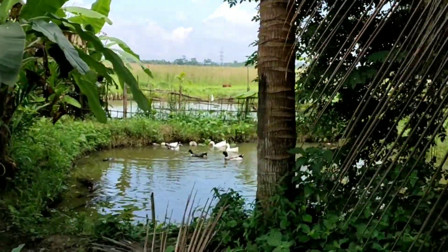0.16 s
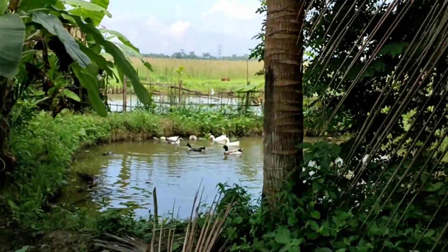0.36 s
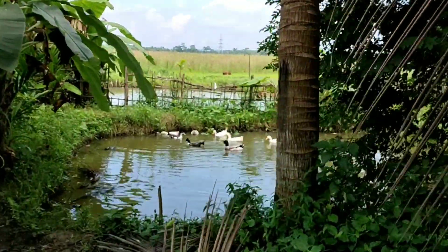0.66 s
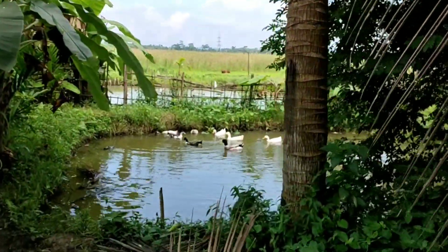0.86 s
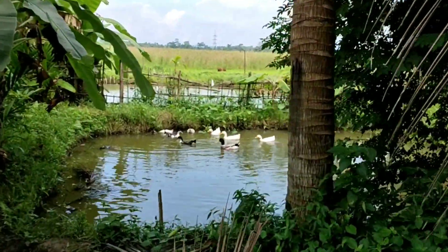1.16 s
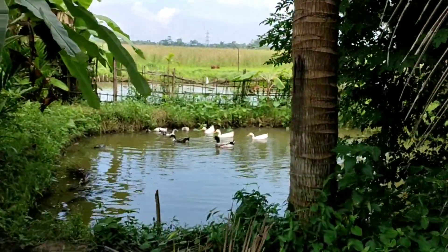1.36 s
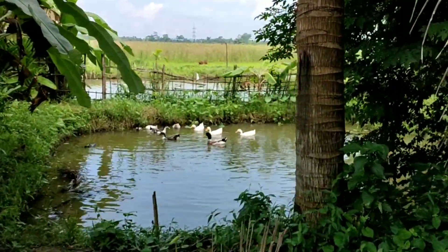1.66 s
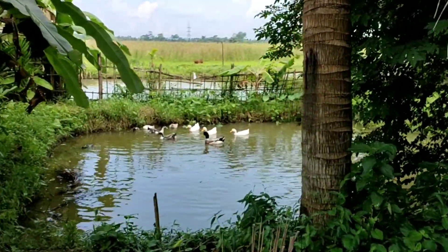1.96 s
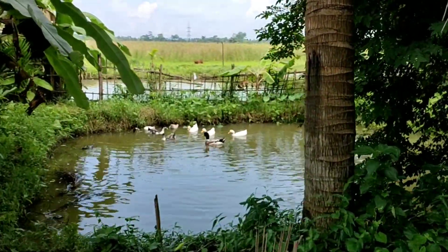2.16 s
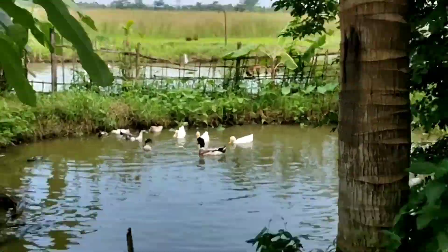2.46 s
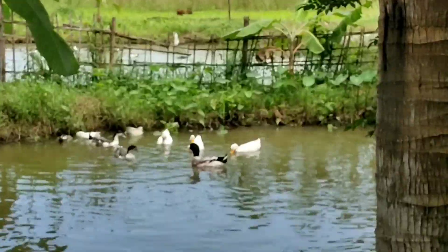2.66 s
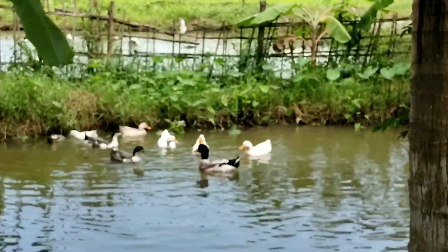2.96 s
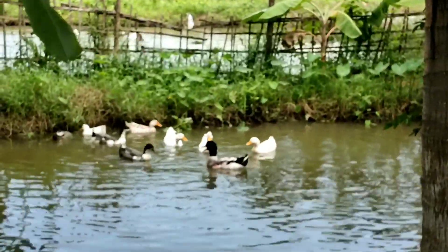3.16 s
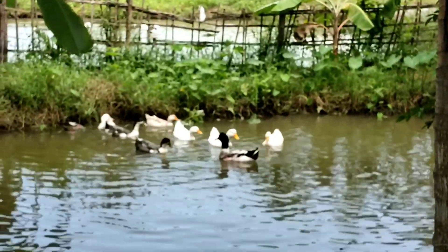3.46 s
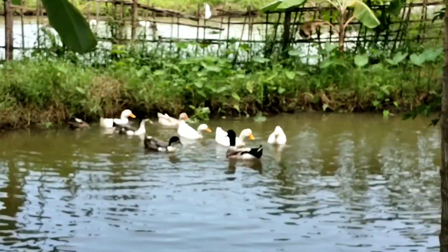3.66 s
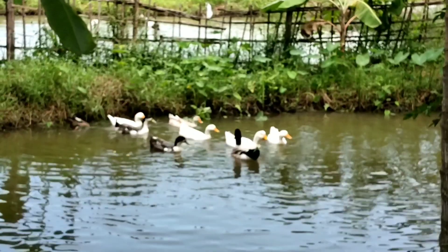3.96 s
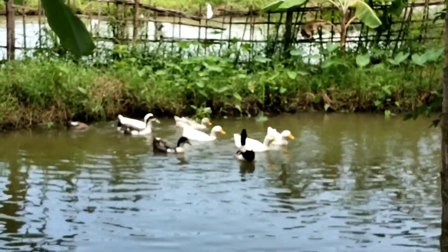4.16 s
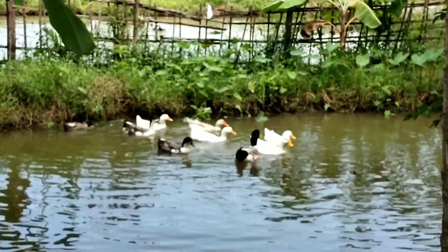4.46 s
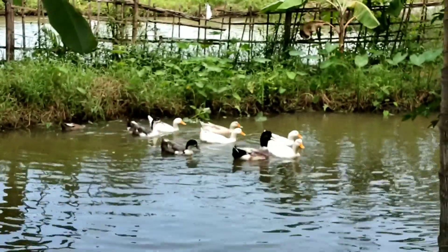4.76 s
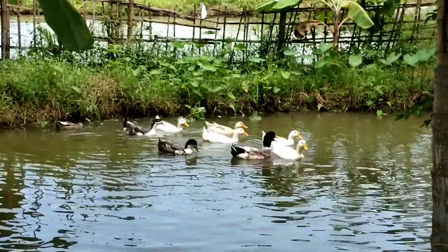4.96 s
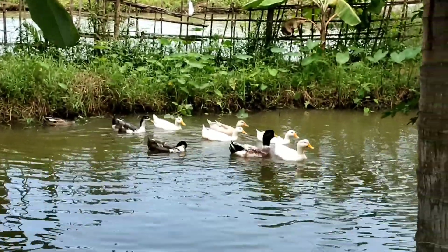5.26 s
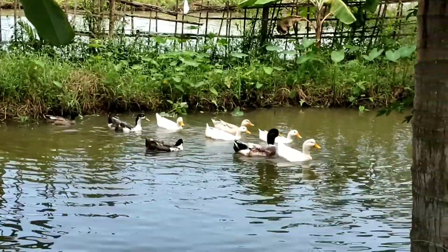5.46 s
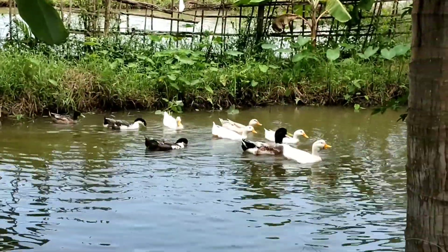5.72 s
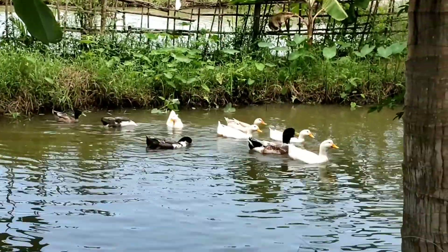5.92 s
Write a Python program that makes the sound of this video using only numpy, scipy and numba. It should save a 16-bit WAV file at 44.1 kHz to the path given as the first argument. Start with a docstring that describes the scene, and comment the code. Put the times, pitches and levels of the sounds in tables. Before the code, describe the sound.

Beside a village pond, a domestic duck gives eight strong, buzzy, nasal quacks in steady rhythm, the first already under way at the start. Short airy echoes follow each one. Quiet insects, leaf rustle, water plops, dull thumps and hollow low notes with little scrapes fill the gaps, along with an early bird trill, faint motor buzzes and a distant engine whine late on. Wind lightly brushes the microphone.

```python
"""A duck quacks eight times at an even pace beside a pond: clicks and puffs of its syrinx ring through
beak and throat, and dying bands of noise give the short tail from banks and trees.
Around it, shaped noise makes the far country hum, insects, wind on the microphone, water plops, thumps
and low hollow notes near 330 Hz, some of them the duck's low second harmonic, with short scrapes; falling
sine whistles make a small bird, and sines a small camera motor buzzing now and then and a far engine revving."""
import sys
import numpy as np
from scipy import signal
from scipy.io import wavfile
from scipy.ndimage import uniform_filter1d, minimum_filter1d
from numba import njit

SR = 44100
rng = np.random.default_rng(int(sys.argv[2]) if len(sys.argv) > 2 else 0)


def file_out(sig):
    """Save sig as 16-bit WAV at sys.argv[1]."""
    # one column per channel
    cols = np.atleast_2d(sig).T
    # limit, then scale
    lim = np.clip(cols, -1, 1)
    pcm = np.round(lim * 32767).astype(np.int16)
    wavfile.write(sys.argv[1], SR, pcm)


def field_ratio(decibels):
    """Amplitude ratio for a level in dB (20 dB per decade); scalars and array-likes work."""
    return 10 ** (np.asarray(decibels, dtype=float) / 20)


N = 268569


def rms_one(x):
    """Scale to unit rms."""
    return x / np.sqrt(np.mean(x ** 2) + 1e-20)


def in_time(rows):
    """Columns of a table joined by straight lines in time."""
    s, *columns = np.transpose(rows)
    return [np.interp(np.arange(N) / SR, s, c) for c in columns]


def gate(rows, fade_s):
    """One while the table lasts, with short ramps outside it."""
    start, end = rows[0][0], rows[-1][0]
    return np.interp(np.arange(N) / SR, [start - fade_s, start, end, end + fade_s], [0, 1, 1, 0])


def drift(rate_hz):
    """Slow random wander of unit spread, drawn at every 40th sample."""
    r = np.exp(-80 * np.pi * rate_hz / SR)
    slow = signal.lfilter([1], [1, -2 * r, r * r], rng.standard_normal(N // 40 + 2002))[2000:]
    return np.interp(np.arange(N) / 40, np.arange(len(slow)), rms_one(slow))


def filtered(x, order, hz, kind):
    """Butterworth filter."""
    return signal.sosfilt(signal.butter(order, hz, kind, fs=SR, output="sos"), x)


@njit
def sweep(x, hz, r, sr):
    """Two-pole resonance with a moving centre, gain 1 on top."""
    y = np.zeros(len(x))
    for i in range(2, len(x)):
        drive = (1 - r * r) / 2 * (x[i] - x[i - 2])
        y[i] = drive + 2 * r * np.cos(2 * np.pi * hz[i] / sr) * y[i - 1] - r * r * y[i - 2]
    return y


def resonate(x, hz, width_hz):
    """A resonance at a fixed or moving pitch."""
    return sweep(x + 1e-18, hz * np.ones(len(x)), np.exp(-np.pi * width_hz / SR), SR)


def resonate_twice(x, hz, width_hz):
    """Two equal resonances in a row, for steeper skirts."""
    return resonate(resonate(x, hz, width_hz), hz, width_hz)


def modes(x, table):
    """Steep resonances in parallel, signs alternating."""
    total = 0
    for k, (hz, width_hz, db) in enumerate(table):
        mode = resonate(resonate(x, hz, width_hz * 2), hz, width_hz)
        total = total + (-1) ** k * field_ratio(db) * mode
    return total


def evened(x, span_s=0.015):
    """Unit level over a short running span."""
    return x / np.sqrt(uniform_filter1d(x ** 2, int(span_s * SR)) + 1e-12)


def coloured(spectrum, edges, patchy_db):
    """Bands of noise, each flickering on its own; returned band by band, summing to rms 1."""
    white, (hz, db) = rng.standard_normal((2, N)), np.transpose(spectrum)
    bands = []
    for k, (low, high) in enumerate(zip(edges, edges[1:])):
        band = filtered(white[k % 2], 2, [low, high], "band")
        level_db = np.interp(np.log(low * high) / 2, np.log(hz), db)
        bands.append(band * field_ratio(level_db + patchy_db * drift(24)))
    return np.array(bands) / np.sqrt(np.mean(np.sum(bands, axis=0) ** 2))


def swells(rows, rise_s, fall_db_per_s):
    """Gain of events (full_s, level_db, hold_s) that rise to full level, hold and die away."""
    t = np.arange(N) / SR
    gain = 0
    for s, db, hold_s in rows:
        fall_db = fall_db_per_s * np.clip(t - s - hold_s, 0, 1)
        gain = gain + field_ratio(db - fall_db) * np.clip(1 + (t - s) / rise_s, 0, 1)
    return gain


def bursts(rows, rise_s, width):
    """Short noisy notes: a swelling and dying puff through a resonance, its width a share of its pitch."""
    out, t = np.zeros(N + SR), np.arange(SR // 4) / SR
    noise = rng.standard_normal((len(rows), len(t)))
    for puff, (s, db, hz, length_s) in zip(noise, rows):
        note = resonate_twice(puff, hz, width * hz)
        shape = np.clip(t / rise_s, 0, 1) * np.exp(-t / max(length_s, .004))
        start = round(s * SR)
        out[start:start + len(t)] += field_ratio(db) * rms_one(note) * shape / 2
    return out[:N]


# the quacks: first_snap_s, hold_end_s, level_db, first_rate_hz, last_rate_hz (rates of the snaps)
QUACKS = [(-0.12, 0.113, -12.5, 140.2, 162.7), (0.694, 0.927, -14, 131.3, 168.4),
          (1.543, 1.777, -12.5, 141, 167.4), (2.328, 2.557, -12.5, 138.1, 164.6),
          (3.148, 3.373, -12.5, 131, 170.4), (3.908, 4.143, -12.5, 143.7, 172.2),
          (4.645, 4.886, -13, 142.9, 170.9), (5.442, 5.667, -11.5, 134.3, 163.5)]
# the gesture all quacks share: share_of_call, relative_level_db, share_of_pitch_rise, beak_hz,
# mid_throat_db, upper_throat_db, lower_throat_db
QUACK_GESTURE = [(0, -25, 0.024, 1300, -3, -11.5, -1.5), (.08, -21, 0.065, 1300, -10.5, -13.5, -8.5),
                 (.16, -8, .12, 1506, -5, -7, -3.5), (.25, -3.5, .28, 1670, -1, -16, -0.5),
                 (.36, 1.1, .65, 1650, -2, -6.5, 0.2), (0.609, 1, .9, 1750, -6, -3, -0.7),
                 (1.024, -2, 1, 1838, -3.5, -5, 6.4), (1.088, -42.5, 0.76, 1720, 15.5, -30, -4)]


def calls():
    """Every quack stretches the common gesture over its own length, level and pitch range."""
    share, db, rise, *throat = np.transpose(QUACK_GESTURE)
    rows = []
    for s, end, peak_db, first_hz, last_hz in QUACKS:
        pitch_hz = first_hz + rise * (last_hz - first_hz)
        rows.append(np.transpose([s + share * (end - s), peak_db + db, pitch_hz, *throat, share]))
    return rows


HALF_SNAP_DB, HALF_SNAP_FADES = -6, .25   # second snap in mid cycle; gone by this share of the call
BREATH_GROWS = .3   # share of the call by which turbulence reaches full strength


def syrinx(pitch_hz, share, puff_s=0.00085):
    """The syrinx snaps shut once a cycle; each snap is a click with a short puff of turbulence."""
    phase = np.cumsum(pitch_hz * (1 + .004 * drift(60))) / SR
    for first in [round(q[0] * SR) for q in QUACKS[1:]]:      # these calls open on a snap
        phase[first:] += np.ceil(phase[first]) - phase[first]
    snaps = np.diff(np.floor(phase), prepend=0) * field_ratio(1.3 * rng.standard_normal(N))
    half_snaps = np.diff(np.floor(phase + .5), prepend=0) * field_ratio(HALF_SNAP_DB)
    snaps = snaps + half_snaps * np.clip(1 - share / HALF_SNAP_FADES, 0, 1)
    r = np.exp(-1 / (puff_s * SR))
    puff = signal.lfilter([(1 - r) * np.e], [1, -2 * r, r * r], snaps)      # swells, then dies
    turbulence = (puff + .1) * rng.standard_normal(N) * np.clip(share / BREATH_GROWS, .6, 1)
    bright = filtered(turbulence, 1, 1200, "high")
    clear, raspy = snaps + .075 * bright, snaps + .14 * turbulence
    return clear, raspy


# fixed resonances of windpipe and throat: pitch_hz, width_hz, relative_level_db
LOWER_THROAT = [(330, 110, -26), (1120, 300, -15), (600, 500, -32), (2230, 300, -8), (2950, 450, -5),
                (3680, 380, -4)]
MID_THROAT = [(4662, 435, 0)]
UPPER_THROAT = [(5470, 660, 2.57), (5994, 456, 5.8)]
# faint top resonances of the bill: pitch_hz, width_hz, relative_level_db
BILL = [(7150, 350, -11), (8070, 460, -24.5), (9520, 360, -32), (10400, 460, -36), (11370, 420, -44),
        (12000, 670, -36)]
SIDE_CAVITY_HZ, THROAT_TOP_HZ = 4240, 6410   # a side pocket swallows one band; the throat closes above


def duck(beak_width_hz=480, water_s=0.00078, water_db=-12.0):
    """Snaps ring through a moving beak and fixed throat resonances, whose balance shifts in the call."""
    gesture = calls()
    level_db, pitch_hz, beak_hz, mid_db, upper_db, lower_db, share = in_time(np.vstack(gesture))
    clear, raspy = syrinx(pitch_hz, share)
    beak = resonate_twice(clear, beak_hz, beak_width_hz)
    lower = evened(beak + field_ratio(lower_db) * modes(clear, LOWER_THROAT))
    middle = evened(modes(raspy, MID_THROAT))
    throat_top = filtered(modes(raspy, UPPER_THROAT), 6, THROAT_TOP_HZ, "low")
    upper = evened(throat_top + modes(raspy, BILL))
    mid, high = field_ratio(mid_db), field_ratio(upper_db)       # the upper throat speaks once the neck is stretched
    low = np.sqrt(np.clip(1 - mid ** 2 - high ** 2, .05, 1))   # the lower throat gets the remaining power
    voice = low * lower - mid * middle + high * upper
    voice = voice - 0.9 * resonate(voice, SIDE_CAVITY_HZ, 260)
    voice = voice + field_ratio(water_db) * np.roll(voice, round(water_s * SR))      # mirror image in the water
    return voice * field_ratio(level_db) * sum(gate(q, 0.0019) for q in gesture)


# tail from the banks: band_hz, t60_s, relative_level_db
BANK_TAIL = [(1300, 0.068, -16), (2510, 0.39, -16), (3420, 0.33, -23), (5500, 0.44, -36),
             (7750, 0.33, -27.5)]
# one hollow of the bank rings longer: pitch_hz, width_hz, t60_s, relative_level_db
BANK_HOLLOW = (2200, 258, 0.5, -23)


def banks(x, rise_s=0.0013):
    """Scattered echoes: nearly octave-wide bands of dying noise and one narrow ring."""
    t = np.arange(SR // 2) / SR

    def echo(dying, hz, db):
        """Unit energy, then level and a weight growing with pitch."""
        return field_ratio(db) * dying / np.sqrt(np.sum(dying ** 2)) * np.sqrt(hz / SR * 2)

    reply = 0
    for hz, t60, db in BANK_TAIL:
        band = filtered(rng.standard_normal(len(t)), 2, [hz / 1.85, hz * 1.05], "band")
        dying = band * field_ratio(-60 * t / t60) * np.clip(t / rise_s, 0, 1)
        reply = reply + echo(dying, hz, db)
    hz, width_hz, t60, db = BANK_HOLLOW
    dying = resonate(rng.standard_normal(len(t)), hz, width_hz) * field_ratio(-60 * t / t60)
    reply = reply + echo(dying, hz, db)
    return signal.fftconvolve(x, reply)[:N] * 2


# gusts: full_s, level_db, hold_s
GUSTS = [(0.63, -55, 0.24), (1.15, -58, 0.094), (2.54, -64, .08), (3.02, -55, 0.075), (3.27, -44, 0.057),
         (3.68, -58, 0.078), (4.0, -48.5, 0.069), (4.76, -61, 0.037), (5.27, -64, 0.33), (5.71, -72, 0.028)]


def gust_gain():
    """Gusts rise fast, hold and die away."""
    return swells(GUSTS, rise_s=0.047, fall_db_per_s=233)


# liveliness of the surroundings: time_s, murmur_db
BREEZE = [(0.0, -46), (0.24, -48.5), (1.17, -52), (1.66, -44.5), (1.87, -42), (2.61, -51), (4.04, -48),
          (4.43, -53.5), (6.09, -50)]
# colour of the open air: pitch_hz, relative_density_db (per Hz)
AIR = [(150, -0.5), (400, 1), (900, -4), (1300, -7), (1800, -17), (2200, -10), (3500, -13.5), (4600, -12),
       (6800, -18), (8200, -30), (16000, -45)]
# steady insects: pitch_hz, width_hz (of each of two resonances), level_db, throb_db
INSECTS = [(5650, 1330, -55.5, 2.5), (7600, 350, -64.5, 2.2)]
AIR_DB, MURMUR_IN_GUST_DB = -47, -1
RUSTLE_FOLLOWS = 1   # dB of rustle per dB of murmur


def surroundings(gusts):
    """Country hum: low murmur and high rustle swell together, gusts lift the murmur; insects on top."""
    murmur_db, = in_time(BREEZE)
    edges = np.geomspace(150, 16000, 21)
    bands = coloured(AIR, edges, patchy_db=2.5)
    low = edges[1:] < 1300
    murmur = field_ratio(murmur_db + 0.5 * drift(4.9)) + field_ratio(MURMUR_IN_GUST_DB) * gusts
    rustle = field_ratio(AIR_DB + RUSTLE_FOLLOWS * (murmur_db - murmur_db.mean()))
    out = murmur * rms_one(bands[low].sum(axis=0)) + rustle * bands[~low].sum(axis=0)
    for hz, width_hz, db, throb_db in INSECTS:
        band = resonate_twice(rng.standard_normal(N), hz, width_hz)
        out += field_ratio(db + throb_db * drift(14)) * rms_one(band)
    return out


def wind(gusts, steady_db=-54.5):
    """Lumpy low turbulence on the microphone port."""
    noise = filtered(rng.standard_normal(N), 2, [62, 175], "band")
    return (field_ratio(steady_db + 2.5 * drift(5)) + gusts) * rms_one(noise)


# low hollow notes, some of them the duck's low second harmonic, and short scrapes:
# full_s, note_db, scrape_db, pitch_hz (of the note)
HOLLOW_NOTES = [(0.09, -45.5, -64, 337), (0.76, -41.5, -41, 302), (0.841, -54, -60, 328),
                (1.608, -46, -60, 332), (1.77, -47, -32, 342), (1.868, -31.5, -32, 340),
                (1.949, -34.5, -72, 338), (1.97, -39, -33.5, 350), (2.006, -39.5, -54, 332),
                (2.14, -57, -53, 335), (2.44, -41, -65, 355.3), (2.502, -44, -34, 319.4),
                (2.57, -45.5, -64, 307)]
# colour of the scrape: pitch_hz, relative_density_db (per Hz)
SCRAPE = [(420, 3), (950, 4), (1600, -9), (2500, 0), (3700, -16), (4800, 0), (6500, -17.5), (8000, -38),
          (12000, -34)]


def hollow_notes():
    """Low notes near 330 Hz, noise through narrow resonances, with short scrapes of broad noise."""
    hz, = in_time([(s, hz) for s, _, _, hz in HOLLOW_NOTES])
    narrow = resonate(resonate(rng.standard_normal(N), hz, 13.0), hz, 28.0)
    note = evened(narrow, span_s=0.029)
    scrape = coloured(SCRAPE, np.geomspace(420, 12000, 13), patchy_db=1).sum(axis=0)
    note_gain = swells([(s, db, 0.01) for s, db, _, _ in HOLLOW_NOTES], rise_s=0.017, fall_db_per_s=151)
    scrape_gain = swells([(s, db, 0.005) for s, _, db, _ in HOLLOW_NOTES], rise_s=0.016, fall_db_per_s=158)
    return note * note_gain + scrape * scrape_gain


# trills of a small bird: start_s, level_db, top_hz, lost_db (from the third note on)
TRILLS = [(0.278, -34.5, 5830, 0.5), (0.524, -32, 5840, 3.5), (5.75, -42.5, 6110, 11),
          (5.954, -38.5, 6060, 16)]
# level of each note in a trill: relative_level_db
NOTE_DB = [-8, 2.5, 4, -1.5, -21]
NOTE_SPACING_S, NOTE_S, NOTE_FALL_HZ, NOTE_ROUNDING = .044, 0.0206, 1200, 1.1


def bird():
    """Trills of short whistles, each a sine gliding down under a rounded envelope."""
    out, u = np.zeros(N + SR), np.linspace(0, 1, round(NOTE_S * SR))
    for s, db, top_hz, lost_db in TRILLS:
        whistle = np.sin(2 * np.pi * np.cumsum(top_hz - NOTE_FALL_HZ * u) / SR)
        note = whistle * np.sin(np.pi * u) ** NOTE_ROUNDING
        for k, note_db in enumerate(NOTE_DB):
            i = round((s + k * NOTE_SPACING_S) * SR)
            out[i:i + len(u)] += field_ratio(db + note_db - lost_db * (k > 1)) * note
    return out[:N]


# plops and dabbling beaks: start_s, relative_level_db, pitch_hz, decay_s
PLOPS = [(0.334, -34, 1110, 0.016), (1.057, -38.5, 974, 0.023), (1.22, -38, 318, 0.023),
         (1.244, -50, 284, 0.03), (1.335, -41, 517, 0.077), (1.466, -26.5, 1195, 0.016),
         (2.187, -43, 700, 0.032), (2.789, -46, 1524, 0.031), (2.988, -34, 840, 0.058),
         (3.034, -42, 850, 0.018), (3.693, -35.5, 497, 0.021), (4.359, -36.5, 1146, 0.016),
         (5.124, -40, 282, 0.034), (5.699, -39.5, 2000, 0.032), (5.88, -38, 1130, 0.037)]


def plops():
    """Water plops: quick puffs of noise through a fairly narrow resonance."""
    return bursts(PLOPS, rise_s=0.0017, width=0.15)


# dull low thumps: start_s, relative_level_db, pitch_hz, decay_s
THUMPS = [(0.612, -35.5, 171, 0.036), (1.575, -28, 140, 0.027), (3.255, -26.5, 188.8, 0.039),
          (3.31, -34, 137, 0.052), (3.99, -25.5, 172.5, 0.043), (4.07, -41, 136, 0.06),
          (5.695, -32, 308, 0.015)]


def thumps():
    """Dull thumps: softer-edged puffs of noise through a low, wide resonance."""
    return bursts(THUMPS, rise_s=0.016, width=0.3)


# spells of the camera motor: start_s, end_s, relative_level_db
BUZZES = [(3.646, 3.764, -47), (4.176, 4.329, -49.5), (5.845, 6.024, -47)]
# harmonics of the motor, from the fundamental up: relative_level_db
BUZZ_DB = [-4, -4.5, -7.5, -13, -25, -16, -20, -17]
BUZZ_HZ = 199.6
# a far engine revs: time_s, pitch_hz, relative_level_db
WHINE = [(5.19, 385.0, -55), (5.3, 465, -56), (5.422, 547.3, -54), (5.578, 533, -49.5), (5.62, 500, -54)]


def motors():
    """A steady harmonic buzz in short spells and one unsteady whine that rises, then sags."""
    t = np.arange(N) / SR
    buzz = sum(field_ratio(db) * np.cos(2 * np.pi * (k + 1) * BUZZ_HZ * t) for k, db in enumerate(BUZZ_DB))
    spells = sum(field_ratio(db) * gate([[start], [end]], 0.012) for start, end, db in BUZZES)
    hz, db = in_time(WHINE)
    tone = np.sin(2 * np.pi * np.cumsum(hz * (1 + 0.016 * drift(30))) / SR)
    whine = tone * field_ratio(db + 3.1 * drift(20)) * gate(WHINE, 0.051)
    return np.sqrt(2) * (buzz * spells + whine)


def scene():
    """All sources, heard from the bank."""
    voice, trill = duck(), bird()
    gusts = gust_gain()
    tail = banks(voice + field_ratio(20) * trill)   # the bird excites the banks far more than its direct level
    near = voice + tail + trill + plops() + thumps()
    mix = near + surroundings(gusts) + wind(gusts) + hollow_notes() + motors()
    return mix[None]


def top_cut(x):
    """Nothing passes above the cut-off."""
    return signal.sosfilt(signal.butter(12, 15750, fs=SR, output="sos"), x)


def record(dry, hiss_db=-58.5):
    """Steady microphone hiss; a fast limiter keeps the peaks just under full scale."""
    hiss = filtered(rng.standard_normal(N), 2, 3000, "high")
    x = dry + field_ratio(hiss_db) * hiss   # hiss_db: level of the white noise ahead of its high-pass
    peak = -minimum_filter1d(-np.abs(x), size=133)
    gain = uniform_filter1d(np.minimum(1, .98 / (peak + 1e-9)), size=67)
    return top_cut(x * gain)


dry = scene()
out = record(dry)
file_out(out)
```